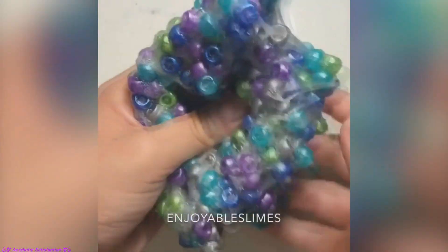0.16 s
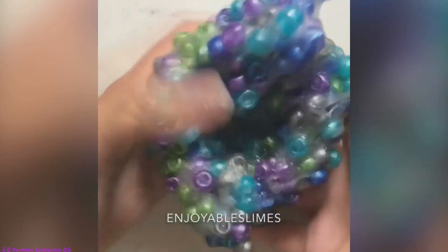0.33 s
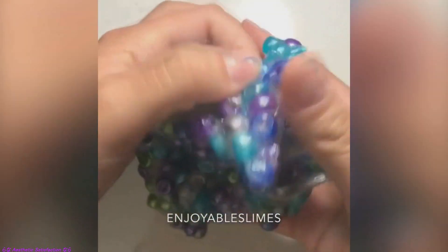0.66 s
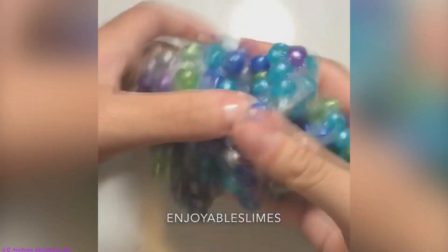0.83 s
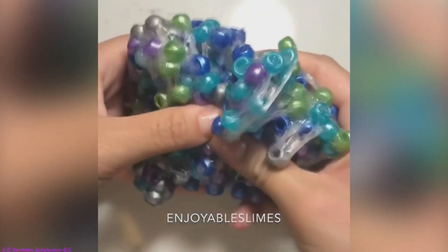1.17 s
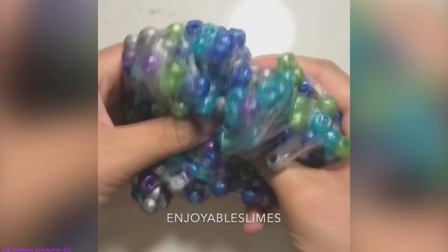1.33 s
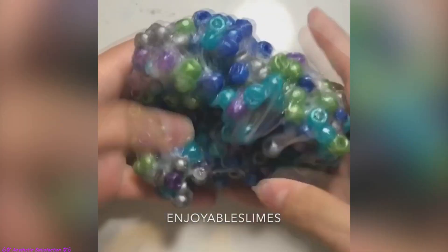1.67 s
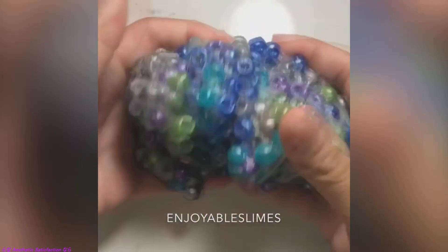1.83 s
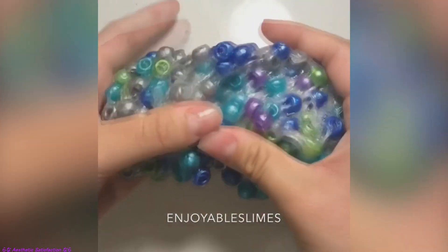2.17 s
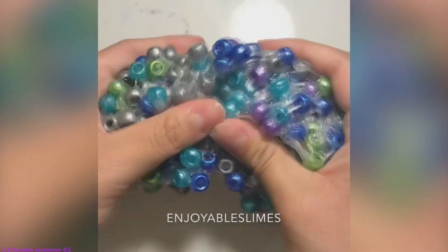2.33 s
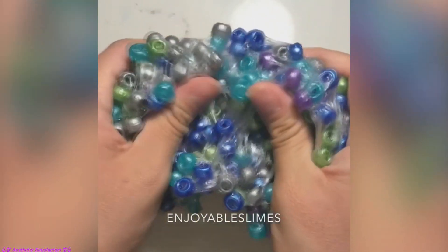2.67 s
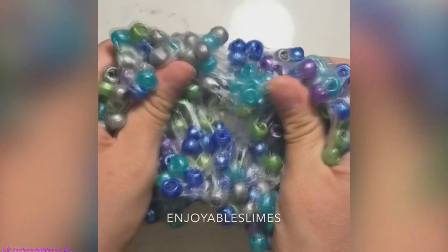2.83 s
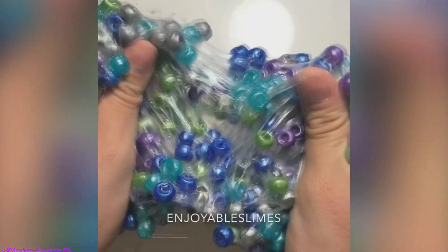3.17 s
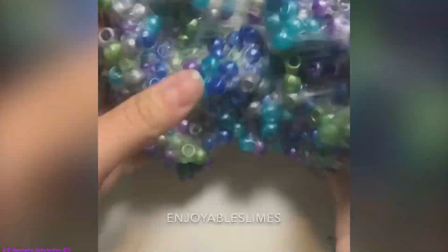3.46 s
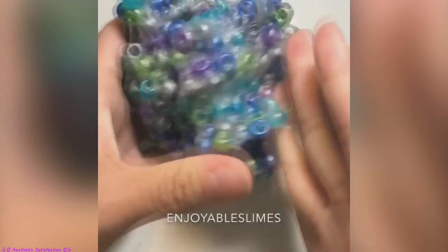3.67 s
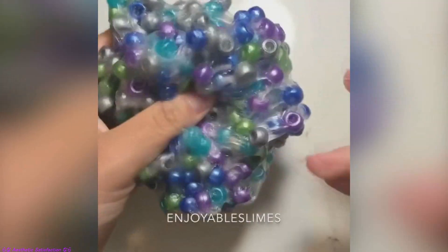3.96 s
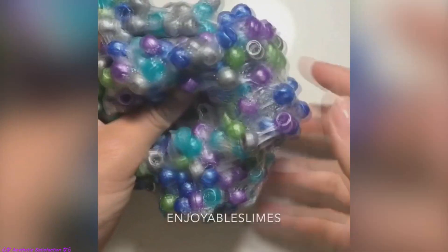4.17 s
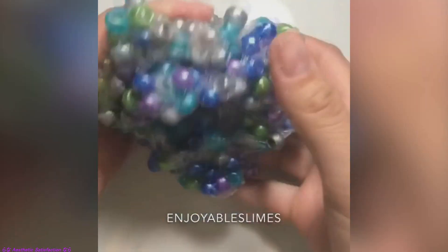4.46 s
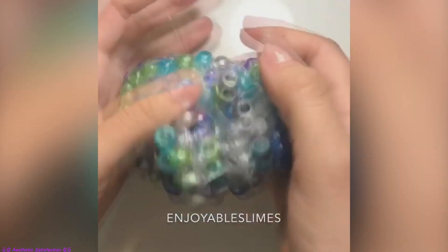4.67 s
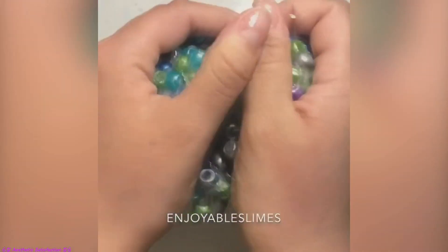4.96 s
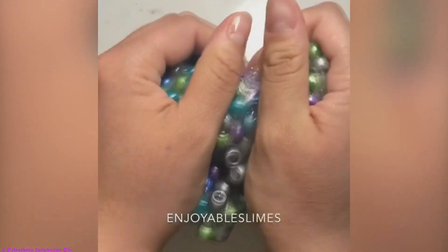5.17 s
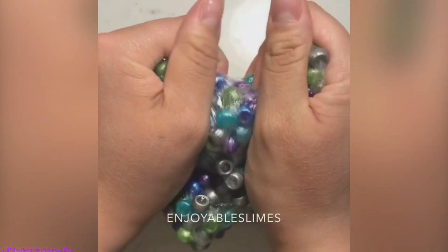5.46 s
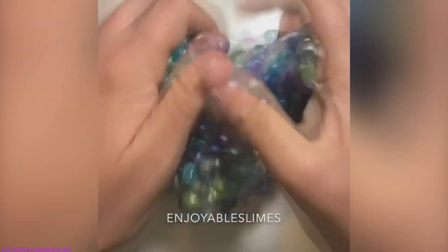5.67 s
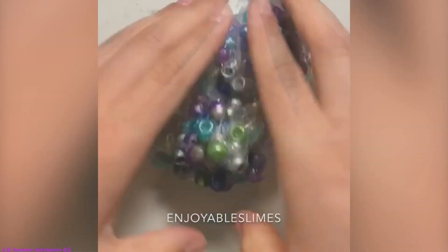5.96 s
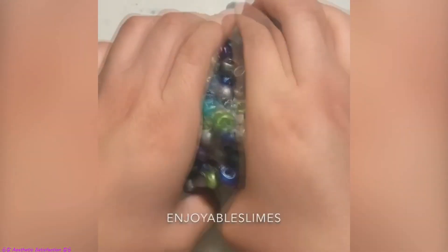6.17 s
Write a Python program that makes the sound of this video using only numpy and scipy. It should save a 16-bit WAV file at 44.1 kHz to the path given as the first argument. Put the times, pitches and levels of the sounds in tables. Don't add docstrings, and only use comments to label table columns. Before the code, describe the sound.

Close, crisp snapping and squelching of bead-filled slime being folded, pulled and squeezed, ending in a thick crackling burst and a few sparse ticks.

```python
import sys
import numpy as np
from scipy import signal
from scipy.fft import rfft, irfft
from scipy.io import wavfile
from scipy.ndimage import uniform_filter1d, minimum_filter1d

SR = 44100
rng = np.random.default_rng(int(sys.argv[2]) if len(sys.argv) > 2 else 0)


def voltage_ratio(level):
    return 10 ** (np.asarray(level, float) / 20)


def output_pcm(signal):
    pcm = np.clip(np.atleast_2d(signal).T, -1, 1) * 32767
    wavfile.write(sys.argv[1], SR, np.round(pcm).astype(np.int16))


N = 277815

SHELF_HZ, SHELF_DB = 14000, -14


def rms_one(x):
    return x / np.sqrt(np.mean(x ** 2) + 1e-20)


def at_hz(points, hz):
    point_hz, point_db = np.array(points).T
    return np.interp(np.log(hz), np.log(point_hz), point_db)


def drift(rate_hz):
    pole = np.exp(-40 * np.pi * rate_hz / SR)
    noise = rng.standard_normal(N // 20 + 2002)
    slow = signal.lfilter([1], [1, -2 * pole, pole * pole], noise)[2000:]
    return np.interp(np.arange(N) / 20, np.arange(len(slow)), rms_one(slow))


def ring(clicks, hz, t60):
    radius, angle = voltage_ratio(-60 / (t60 * SR)), 2 * np.pi * hz / SR
    poles = [1, -2 * radius * np.cos(angle), radius * radius]
    return signal.lfilter([0, np.sin(angle)], poles, clicks + 1e-18)


def coloured(spectrum):
    hz = np.maximum(np.arange(N // 2 + 1) * SR / N, 1)
    return rms_one(irfft(rfft(rng.standard_normal(N)) * voltage_ratio(at_hz(spectrum, hz)), N))


def highpass(x, order, hz):
    return signal.sosfilt(signal.butter(order, hz, "high", fs=SR, output="sos"), x)


def step_down(x, hz, db):
    below = signal.sosfiltfilt(signal.ellip(10, .1, 30, hz, fs=SR, output="sos"), x)
    return below + voltage_ratio(db) * (x - below)


def dome_db(start, fullest, end):
    edge_db, roundness = -14.5, 1.87
    t = np.arange(N) / SR
    away = np.where(t < fullest, (fullest - t) / (fullest - start), (t - fullest) / (end - fullest))
    return edge_db * away ** roundness


def rumble():
    # f/Hz, bandwidth/Hz, level/dB
    modes = [
        (35, 9, -63),
        (57, 9, -50),
        (70, 11, -55),
        (104, 14, -64),
    ]
    out = 0
    for hz, width_hz, db in modes:
        t60 = np.log(1000) / np.pi / width_hz
        stirred = ring(rng.standard_normal(N), hz, t60)
        out = out + voltage_ratio(db) * rms_one(ring(stirred, hz, t60 / 2))
    return out


def air_hiss():
    # f/Hz, level per Hz/dB
    air_spectrum = [(30, -27.5), (45, -18), (80, -21), (120, -7), (250, -15), (500, -20.5), (1500, -23.5),
                    (6000, -26), (13000, -31), (16000, -28)]
    return voltage_ratio(-57.5) * voltage_ratio(1.1 * drift(25)) * coloured(air_spectrum)


def surroundings(x):
    # t/s, level/dB
    echoes = [
        (.0013, -23),
        (.0026, -28.5),
        (.0042, -36),
        (.0061, -20),
    ]
    room_t60_s, room_db = 0.26, -24
    t = np.arange(int(.2 * SR)) / SR
    tail = rng.standard_normal(len(t)) * voltage_ratio(-60 * t / room_t60_s) * (t > .003)
    tail = signal.sosfilt(signal.butter(2, 6700, fs=SR, output="sos"), tail)
    response = voltage_ratio(room_db) * tail / np.sqrt(np.sum(tail ** 2))
    response[0] = 1
    for s, db in echoes:
        response[round(s * SR)] += voltage_ratio(db)
    return signal.fftconvolve(x, response)[:N]


def kneading():
    # start t/s, hardest t/s, end t/s, crackle level/dB, squelch rel. crackle/dB
    presses = [(-0.12, 0.107, 0.19, -46, 1.5), (0.14, 0.21, 0.33, -47.5, 2), (0.395, 0.4, 0.53, -48, -0.5),
               (0.743, 0.907, 1.0, -54, -13.5), (0.997, 1.067, 1.13, -44.5, -31),
               (1.136, 1.266, 1.36, -47.5, 1), (1.237, 1.59, 1.67, -42, 5), (1.746, 1.76, 1.86, -42, 2),
               (1.967, 2.044, 2.22, -53, -4.5), (2.14, 2.294, 2.36, -47, 1.5), (2.357, 2.45, 2.95, -42, 0),
               (2.74, 3.005, 3.36, -42.5, 3), (3.45, 3.52, 3.74, -37, -4), (3.7, 3.84, 3.94, -49, 0),
               (3.98, 3.985, 4.1, -51.5, -17), (4.057, 4.24, 4.37, -45, 2.5),
               (4.455, 4.456, 4.51, -34.5, -5), (4.57, 4.67, 4.92, -49, -0.5),
               (4.914, 4.95, 4.99, -49.5, 1), (5.007, 5.103, 5.2, -46.5, 0),
               (5.141, 5.316, 5.47, -34, -0.5), (5.351, 5.527, 5.71, -34, -2), (5.737, 5.825, 5.94, -43, 3)]
    rest_db, rest_wet_db = -63.5, 4
    crackle = voltage_ratio(2 * rest_db)
    squelch = voltage_ratio(2 * (rest_db + rest_wet_db))
    for start, hardest, end, db, wet_db in presses:
        power = voltage_ratio(2 * (db + dome_db(start, hardest, end)))
        crackle = crackle + power
        squelch = squelch + voltage_ratio(2 * wet_db) * power
    return 10 * np.log10(squelch), 10 * np.log10(crackle)


def palms(squelch_db):
    # f/Hz, level per Hz/dB
    skin_spectrum = [(90, -12), (160, 3.5), (350, 3), (600, -9), (1200, -33)]
    return voltage_ratio(1.39 * squelch_db - 6 + 2.5 * drift(30)) * coloured(skin_spectrum)


def wet_hiss(crackle_db):
    # start t/s, fullest t/s, end t/s, level/dB
    slurps = [
        (0.413, 0.424, 0.49, -46.5),
        (1.739, 1.755, 1.8, -39),
        (3.474, 3.504, 3.68, -39.5),
        (4.454, 4.486, 4.5, -39),
        (5.779, 5.836, 5.91, -34.5),
    ]
    # f/Hz, level per Hz/dB
    gel_spectrum = [(450, -3), (900, -5), (2000, -4), (5000, -5.5), (8000, -6), (14000, -12.5),
                    (17000, -44)]
    flow = voltage_ratio(crackle_db - 15.5)
    for *times, db in slurps:
        flow = flow + voltage_ratio(db + dome_db(*times))
    lumps = voltage_ratio(1.4 * drift(99) + 2.2 * drift(23))
    return flow * lumps * coloured(gel_spectrum)


def gurgles():
    # start t/s, fullest t/s, end t/s, level/dB, f/Hz
    pockets = [
        (1.769, 1.772, 1.776, -40, 740),
        (1.76, 1.772, 1.81, -40, 2750),
        (5.8, 5.83, 5.875, -43, 1330),
        (5.825, 5.84, 5.866, -42, 2100),
        (5.808, 5.818, 5.845, -40.5, 4800),
    ]
    out, lumps = 0, voltage_ratio(2.5 * drift(76))
    for *times, db, hz in pockets:
        t60 = 7.8 / hz
        sounding = ring(ring(rng.standard_normal(N), hz, t60), hz, t60)
        out = out + voltage_ratio(db + dome_db(*times)) * rms_one(sounding)
    return lumps * out


def grains(spectrum, per_s, cycles, uneven_db, clumps_db, count):
    sizes = voltage_ratio(uneven_db * np.minimum(rng.exponential(1, N), 3)) * rng.choice([-1, 1], N)
    born = rng.random(N) < per_s * voltage_ratio(clumps_db) / SR
    tears = sizes * born / np.sqrt(per_s)
    dealt = rng.integers(0, count, N)
    out = np.zeros(N)
    for k, hz in enumerate(np.geomspace(spectrum[0][0], spectrum[-1][0], count)):
        soft = ring(tears * (dealt == k), hz, 1.4 / hz)
        out += voltage_ratio(at_hz(spectrum, hz)) * hz ** 1.5 * ring(soft, hz, cycles / hz)
    return rms_one(out)


def tearing_films(squelch_db, crackle_db, busier):
    # f/Hz, level/dB
    wet_spectrum = [(550, 1.5), (900, 7), (1400, 9.5), (2400, 7.5)]
    # f/Hz, level/dB
    fine_spectrum = [(2500, 9), (4000, 8), (5500, 11), (8000, 6), (11000, -0.5), (14000, -3)]
    slips = drift(70)
    wet = grains(wet_spectrum, 600 * busier, 8.0, 4.2, 5.0 * slips, count=14)
    fine = grains(fine_spectrum, 1500 * busier, 10.2, 2.5, 6.0 * slips, count=18)
    return voltage_ratio(squelch_db - 4.5) * wet + voltage_ratio(crackle_db - 1.5) * fine


def burst(t, hz, cycles, rise):
    turns = t * hz
    shape = (1 - np.exp(-turns / rise)) * np.exp(-turns / cycles)
    return np.sin(2 * np.pi * turns) * shape / shape.max(axis=1, keepdims=True)


def pings():
    # t/s, peak level/dB, f/Hz
    bead_pings = [(0.0085, -29.5, 8100), (0.0202, -36, 6070), (0.0764, -27, 5640), (0.1029, -25.5, 6120),
                  (0.1306, -29, 12800), (0.224, -29.5, 2240), (0.2421, -30, 8400), (0.4779, -33, 9430),
                  (0.8023, -29, 12580), (0.8433, -33, 9000), (0.919, -33, 8400), (0.98, -39, 8940),
                  (0.9621, -37.5, 1300), (1.0591, -23, 8680), (1.094, -31, 2330), (1.2018, -34, 9000),
                  (1.2516, -12.5, 5580), (1.3432, -27, 6400), (1.3725, -32, 8050), (1.3792, -19, 6440),
                  (1.5, -32, 6270), (1.5147, -35, 1500), (1.626, -16, 6900), (1.6259, -24, 2300),
                  (1.7537, -35, 9000), (1.8192, -32.5, 9800), (1.8835, -33.5, 12380), (2.0249, -25, 7750),
                  (2.0309, -21, 2520), (2.063, -28, 9500), (2.11, -31, 6200), (2.1291, -29, 12250),
                  (2.1694, -28.5, 9800), (2.3077, -23.5, 4040), (2.3107, -30, 9450), (2.315, -28.5, 9600),
                  (2.3382, -28, 6760),
                  (2.3722, -33.5, 11500), (2.4034, -21, 5380), (2.4586, -23.5, 6870),
                       (2.4681, -30, 9410), (2.446, -33, 800), (2.559, -28, 4670), (2.5648, -21, 6600),
                       (2.5917, -11.5, 9930), (2.6347, -27, 9200), (2.6622, -26, 8460),
                       (2.7176, -28, 12550), (2.736, -25.5, 3010), (2.7444, -26, 2040), (2.7773, -29, 9240),
                       (2.7982, -24.5, 8550), (2.865, -34, 900), (2.9448, -27, 9300), (3.0198, -17.5, 5270),
                       (3.799, -36, 8600), (3.3453, -37.5, 1220), (3.1397, -18, 4630), (3.214, -27, 4970),
                       (3.215, -31.5, 1230), (3.2455, -29, 8460), (3.254, -29.5, 2200), (3.264, -32, 9600),
                       (3.2995, -32, 5530), (3.3684, -33.5, 11400), (3.4433, -33.5, 2100),
                       (3.5289, -23, 1930), (3.5332, -19, 4070), (3.5656, -18, 2770), (3.5986, -22, 8200),
                       (3.6101, -20, 5700), (3.659, -29, 8400), (3.8077, -35.5, 3450), (3.848, -25, 5700),
                       (4.0036, -26, 5900), (4.0337, -28.5, 5600), (4.096, -30, 11400),
                       (4.1225, -22.5, 5320), (4.146, -24.5, 5840), (4.2448, -28, 6450),
                       (4.2941, -24, 4530), (4.3302, -26.5, 6180), (4.3791, -38, 10830), (4.437, -37, 2910),
                       (4.456, -22, 7060), (4.463, -29, 2800), (4.465, -28.5, 9200), (4.538, -29, 7580),
                       (4.6483, -27.5, 8100), (4.7486, -28, 2860),
                  (4.941, -34.5, 1500), (5.0167, -36.5, 3290), (5.0246, -29.5, 2200), (5.038, -30, 2520),
                   (5.0421, -31, 10830), (5.0752, -25, 5400), (5.0907, -27, 9900), (5.1055, -26.5, 4330),
                   (5.106, -34, 1700), (5.1164, -26.5, 8200), (5.1596, -31, 1410), (5.1765, -35, 12000),
                   (5.185, -24.5, 4240), (5.1907, -37, 1570), (5.2058, -23, 8140), (5.2463, -7, 8260),
                   (5.3049, -17.5, 9300), (5.3105, -26, 2110), (5.2105, -28.5, 1400), (5.334, -14, 4270),
                   (5.4004, -17.5, 4700), (5.4062, -23, 8740), (5.4112, -20, 6240), (5.4249, -25, 4480),
                   (5.4396, -19, 5670), (5.4651, -20.5, 2030), (5.4732, -19, 5020), (5.4905, -21, 2140),
                   (5.5148, -13.5, 5150), (5.5235, -23, 5900), (5.5311, -9.5, 9800), (5.5385, -19.5, 2300),
                   (5.5416, -5.5, 8850), (5.5494, -12, 3810), (5.5665, -13, 5260), (5.5896, -19, 11400),
                   (5.5952, -17, 5500), (5.6093, -12.5, 2020), (5.6129, -17, 9000), (5.6367, -22, 9630),
                   (5.644, -14.5, 2700), (5.7247, -26, 9670), (5.7315, -22, 5800), (5.8669, -18, 9400),
                   (6.2126, -29.5, 10100),
                  (1.2644, -28, 5570), (1.3005, -27, 6000), (1.347, -29, 6000), (1.388, -25, 8900),
                      (1.4244, -22.5, 1220), (1.7497, -30, 4940), (3.821, -20.5, 3510), (5.582, -20, 5900),
                      (5.5947, -17, 7060), (5.5975, -30, 4000), (5.629, -24.5, 3480)]
    events = np.array(bead_pings)
    s, peak_db, ring_hz = events.T[:, :, None]
    t = np.arange(300) / SR
    jostle = uniform_filter1d(rng.standard_normal((len(s), len(t))), size=9) * 3
    chatter = voltage_ratio(-9) * jostle * np.exp(-t / 0.0015) * np.sin(2 * np.pi * ring_hz * t)
    shell = burst(t, ring_hz, cycles=2.1, rise=0.27)
    out = np.zeros(N + len(t))
    at = np.round(s * SR).astype(int) + np.arange(len(t))
    np.add.at(out, at, voltage_ratio(peak_db) * (shell + chatter))
    return out[:N]


def snaps(s, peak_db, ring_hz, knock_db, crack_db, rattle_db):
    t = np.arange(400) / SR
    luck = rng.random((len(s), 4))
    jostle = uniform_filter1d(rng.standard_normal((len(s), len(t))), size=9) * 3
    tear = np.diff(rng.standard_normal((len(s), len(t) + 1))) * np.exp(-t / 0.00032)
    cavity = burst(t, ring_hz, 0.91 * voltage_ratio(5.4 * luck[:, :1]), 0.56)
    knock = voltage_ratio(knock_db + 1.5) * burst(t, 1100 * voltage_ratio(6.5 * luck[:, 1:2] - 1.5), 0.51, 0.9)
    film = burst(t, 9800 * voltage_ratio(2.86 * luck[:, 2:3] - 2.5), 6.0, 0.62)
    crack = voltage_ratio(crack_db - 2.0) * (0.57 * tear + 0.45 * film)
    after = (1 - np.exp(-t / 0.00038)) * np.exp(-t / 0.0022)
    rattle = voltage_ratio(rattle_db + 10.5) * jostle * after * np.sin(2 * np.pi * ring_hz * .9 * t)
    out = np.zeros(N + len(t))
    at = np.round((s + .00005) * SR).astype(int) + np.arange(len(t))
    np.add.at(out, np.minimum(at, N), voltage_ratio(peak_db - 1.5) * (cavity + knock + crack + rattle))
    return out[:N]


def faint_ticks():
    tick_times = [
        0.589,
        0.852,
        0.9618,
        6.0794,
        6.157,
    ]
    s = np.array(tick_times)[:, None]
    return snaps(s, -36 + 0 * s, 6200 + 0 * s, -25, 3.9, -13.0)


def strays(crackle_db, busier):
    per_s, over_crackle_db, uneven_db = 30, 10.5, 4
    luck = rng.random((1500, 6))
    at = (luck[:, 0] * N).astype(int)
    keep = luck[:, 1] < per_s * busier[at] * N / SR / len(luck)
    at, luck = at[keep, None], luck[keep]
    peak_db = crackle_db[at] + over_crackle_db - uneven_db * np.log(1 - luck[:, 2:3] * .9)
    ring_hz = 2600 * voltage_ratio(11 * luck[:, 3:4])
    return snaps(at / SR, peak_db, ring_hz, -9 - 16 * luck[:, 4:5], -2 - 12 * luck[:, 5:], -15.5)


def ticks():
    # t/s, peak level/dB, f/Hz
    bead_ticks = [(0.0202, -26, 4680), (0.103, -33, 1760), (0.197, -27, 4370), (0.34, -32, 7200),
                  (0.397, -30, 3600), (0.4774, -25, 2730), (0.4903, -29, 6500), (0.7855, -29.5, 5680),
                  (0.8426, -29.5, 5700), (0.87, -28.5, 3730), (0.908, -28.5, 8500), (1.0673, -27.5, 8800),
                  (1.1176, -31.5, 2330), (1.283, -28.5, 6700), (1.2947, -31, 4100), (1.401, -21, 6700),
                  (1.5004, -21, 3660), (1.568, -22.5, 1990), (1.589, -22.5, 1490), (1.761, -22, 6650),
                  (2.064, -33.5, 1530), (2.124, -24, 8500), (2.1289, -30, 1270), (2.176, -27, 5860),
                  (2.275, -25.5, 9260), (2.306, -32.5, 1290), (2.312, -30, 4530),
                  (2.421, -26.5, 1260), (2.458, -27, 3250), (2.468, -35, 4900), (2.565, -23.5, 1130),
                  (2.624, -21, 6200), (2.6523, -17, 5600), (2.7215, -26, 4100), (2.7616, -17.5, 7700),
                  (2.798, -23.5, 5400), (2.815, -28, 8260), (2.821, -23, 6600), (2.9064, -21.5, 3250),
                  (2.947, -28.5, 1240), (2.9548, -20.5, 2700), (3.0583, -22, 5350), (3.077, -17, 5870),
                  (3.099, -21, 5900), (3.191, -31, 2060), (3.234, -23.5, 4790), (3.263, -24.5, 9700),
                  (3.2776, -29, 9950), (3.333, -31, 4800), (3.373, -30.5, 8600),
                  (3.5025, -20, 2990), (3.518, -16, 6660), (3.602, -22.5, 5780), (3.7295, -25, 6850),
                  (3.847, -32, 1450), (3.873, -34, 2560), (3.915, -30.5, 6160), (3.946, -34.5, 3580),
                  (4.034, -34, 1800), (4.0514, -36, 8500), (4.096, -32, 5030), (4.155, -26, 5230),
                  (4.198, -29.5, 1940), (4.2353, -28.5, 4680), (4.3385, -25, 1430), (4.4094, -31, 4480),
                  (4.437, -33.5, 2050), (4.4744, -15.5, 5640), (4.4859, -16.5, 4390), (4.7467, -33, 1860),
                  (4.7695, -26, 6800), (4.849, -29, 6940),
                  (5.0027, -27, 2410), (5.038, -26.5, 3500), (5.075, -26, 2400), (5.1473, -24, 4370),
                   (5.1904, -24, 1320), (5.2049, -18, 6470), (5.305, -20, 6730), (5.31, -32, 2030),
                   (5.3307, -16, 950), (5.367, -7, 4100), (5.372, -15.5, 7740), (5.4108, -23, 6400),
                   (5.439, -13.5, 3280), (5.481, -14, 4360), (5.49, -19.5, 2190), (5.537, -11, 4920),
                   (5.5621, -14, 4800), (1.245, -31.5, 980), (5.637, -25, 5830), (5.6878, -35, 7900),
                   (5.7027, -26.5, 6950), (1.007, -37, 1500), (5.765, -31.5, 1050), (5.8866, -21, 7100),
                   (6.034, -33, 5230), (6.2126, -45, 10000), (6.2962, -25, 7560)]
    s, peak_db, ring_hz = np.array(bead_ticks).T[:, :, None]
    spread = rng.standard_normal((len(s), 3))
    knock_db = -15 + 4 * spread[:, :1]
    crack_db = -13 + 4 * spread[:, 1:2]
    rattle_db = -13 + 3 * spread[:, 2:]
    return snaps(s, peak_db, ring_hz, knock_db, crack_db, rattle_db)


def pops():
    # t/s, peak level/dB, f/Hz, dull knock rel. level/dB, bright crack
    # rel. level/dB
    loud_snaps = [(0.061, -17.5, 5630, -32, -9), (0.076, -17, 2500, -45, -2), (0.1207, -16, 5330, -16, -5),
                    (0.2236, -15.5, 5140, -19, -1.5), (1.0365, -16, 2290, -40, -7),
                    (1.2519, -15, 2170, -0.5, -23), (1.276, -15.5, 9000, -16, -7),
                    (1.311, -4.5, 4750, -13, -16.5), (1.3133, -5, 2300, -8, -19), (1.37, -16, 6860, -20, -7),
                    (1.4245, -10, 3860, -35, -8), (1.5144, -9.5, 5300, -12, -10), (1.5962, -7, 5920, -38, -39),
                    (1.6113, -10.5, 6100, -45, -36), (1.6258, -9, 4480, -50.5, -27),
                    (1.7236, -36, 5100, -30, 8), (1.958, -5.5, 4915, -41, -13.5),
                    (2.0309, -2.5, 6900, -56, -20),
                    (2.403, -21.5, 2700, -3.5, -11), (2.5171, -12, 4730, -18, -2.5),
                  (2.5915, -4, 5850, -47, -23), (2.6099, -4, 5900, -31, -29), (2.736, -15.5, 5840, -12, -6),
                  (2.8985, -22, 2300, -6.5, -7), (2.9738, -12, 6210, -30, 7.5),
                  (2.982, -13.5, 6150, -29, -15.5), (3.0055, -17, 1320, -9, -32),
                  (3.019, -21, 1450, -1, -25), (3.039, -13, 4800, -9, -11), (3.076, -15, 5270, -8, 6.5),
                  (3.1295, -8.5, 5400, -14.5, -10), (3.1359, -7, 4970, -32, -28),
                  (3.1705, -18.5, 5420, -30, -50), (3.2138, -5.5, 12500, -24.5, -23),
                    (3.5224, -6.5, 5450, -13, -5), (3.5297, -4, 5250, -25, -1.5),
                  (3.5654, -27, 2880, -10, -17), (3.61, -30, 5800, -24, 13), (3.6528, -11.5, 6250, -31, -2),
                  (3.821, -19, 5270, -34, -16), (3.821, -7, 8820, -43, -28), (4.0035, -26.5, 3570, -14, 4),
                  (4.1226, -27.5, 1510, -24, 3.5), (4.283, -19.5, 6270, -19, 3.5),
                  (4.294, -19.5, 5970, -32, 2), (4.456, -14.5, 12800, -37, -13),
                  (4.4642, -23, 2140, -21.5, -10.5), (4.5392, -25.5, 12500, -35.5, 6),
                  (4.6117, -17.5, 5750, -16.5, -1.5),
                    (5.0245, -17.5, 4740, -8, -13.5), (5.2212, -12.5, 3960, -23, -14),
                   (5.2462, -5, 6330, -35, -0.5), (5.2583, -6, 5280, -39, -26),
                   (5.2684, -11.5, 4570, -34, 6.5), (5.275, -6, 5360, -28, -22),
                   (5.286, -4.5, 5180, -6, -16), (5.3277, -8.5, 3740, -10.5, -5),
                   (5.3318, -18, 1250, -4, -15), (5.3541, -5.5, 8180, -22, -19), (5.3652, -1, 5770, -22, -6),
                   (5.3864, -9.5, 5670, -28, -17), (5.424, -8.5, 8260, -33, -26),
                   (5.465, -8, 5660, -23, -23.5), (5.4734, -8.5, 4170, -12, -22),
                   (5.4924, -10.5, 4350, -10, -4.5), (5.5036, -6.5, 8700, -18, -8),
                   (5.531, -9, 4730, -32, -5), (5.5414, -5, 4350, -35.5, -19), (5.55, -16, 3670, -37, 13),
                   (5.5733, -15, 3970, -17, 9.5), (5.6097, 3.5, 4900, -40, -13),
                   (5.6438, -12, 3160, -7, -18), (5.7355, -25.5, 7300, -36.5, 5)]
    events = np.array(loud_snaps)
    s, peak_db, ring_hz, knock_db, crack_db = events.T[:, :, None]
    rattle_db, lag, scatter_db = -20, 0.39, 3.5
    rattle_db = rattle_db - lag * (peak_db - peak_db.mean()) + scatter_db * rng.standard_normal(s.shape)
    return snaps(s, peak_db, ring_hz, knock_db, crack_db, rattle_db)


def scene():
    squelch_db, crackle_db = kneading()
    busier = voltage_ratio(.3 * (crackle_db + 54))
    films = tearing_films(squelch_db, crackle_db, busier)
    slime = pings() + gurgles() + films + wet_hiss(crackle_db) + strays(crackle_db, busier)
    slime = highpass(slime, 3, 643) + highpass(pops() + ticks(), 2, 633)
    hands = slime + palms(squelch_db) + faint_ticks()
    return (surroundings(hands) + air_hiss() + rumble())[None]


def starved(x):
    mask_db, mask_scatter_db, dropout_odds, dropout_hz = -51, 6, 1.1, 12500
    spectrum, hz = rfft(x), np.arange(N // 2 + 1) * SR / N
    loudest = -minimum_filter1d(-np.abs(x), size=1000)
    out, edges = 0, np.geomspace(4500, 16500, 17)
    for low, high in zip(edges, edges[1:]):
        place = np.log(np.maximum(hz, 1) / low) / np.log(high / low) - .5
        band = irfft(spectrum * np.cos(np.pi / 2 * np.clip(place, -1, 1)) ** 2, N)
        level = uniform_filter1d(np.abs(band), size=200)
        threshold_db = mask_db + SHELF_DB * (high > SHELF_HZ) + mask_scatter_db * drift(25)
        masked = level < voltage_ratio(threshold_db) * loudest
        steady = level < 2 * uniform_filter1d(level, size=2000)
        unlucky = drift(15) > dropout_odds + np.abs(np.log(dropout_hz / high))
        dropped = masked | (steady & unlucky)
        out = out + band * uniform_filter1d(1. * dropped, size=150)
    return x - .9 * out


def top_cut(x):
    return signal.sosfilt(signal.butter(12, 17140, fs=SR, output="sos"), x)


def record(dry):
    shelved = step_down(step_down(dry, SHELF_HZ, SHELF_DB), 15900, -23)
    rounded = np.tanh(shelved + shelved ** 3 / 3)
    passed = highpass(step_down(rounded, 17000, -40), 5, 34)
    return top_cut(starved(passed))


dry = scene()
out = record(dry)
output_pcm(out)
```